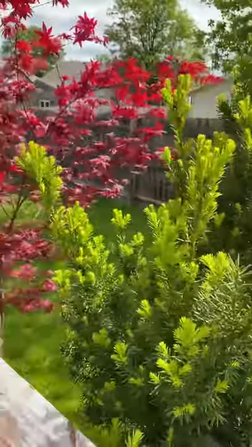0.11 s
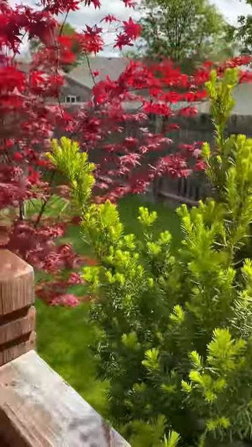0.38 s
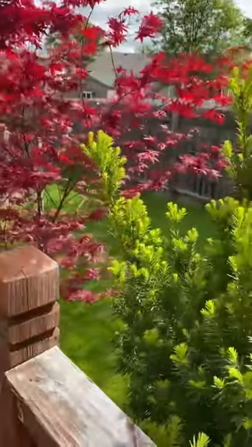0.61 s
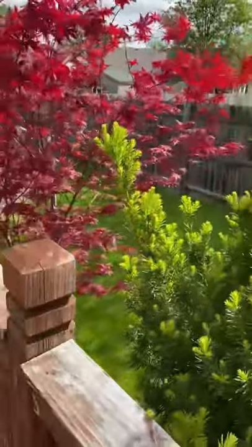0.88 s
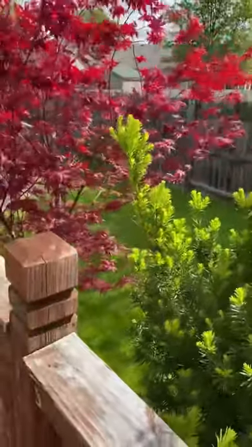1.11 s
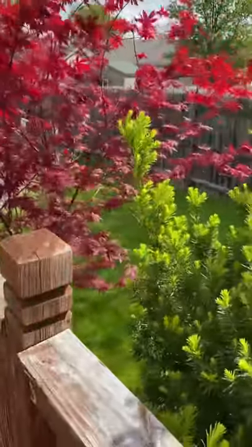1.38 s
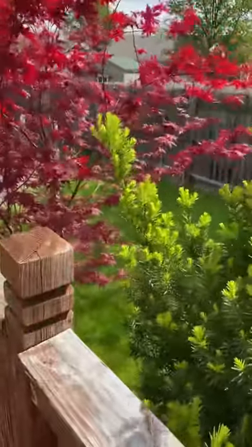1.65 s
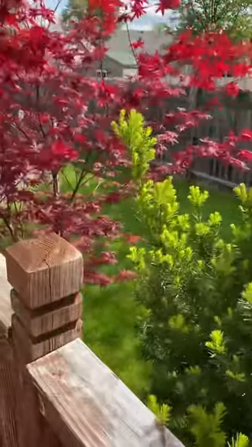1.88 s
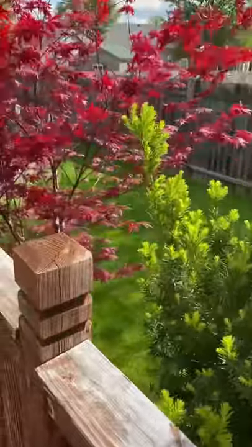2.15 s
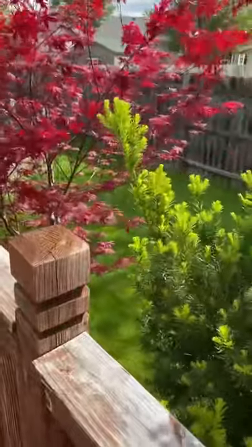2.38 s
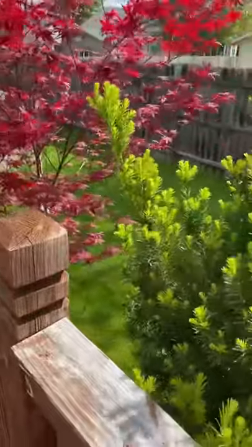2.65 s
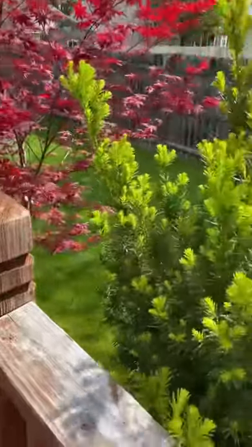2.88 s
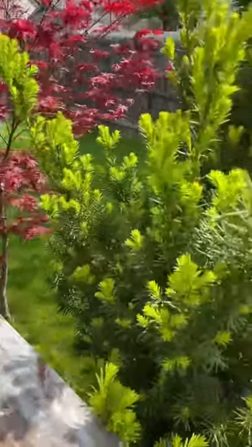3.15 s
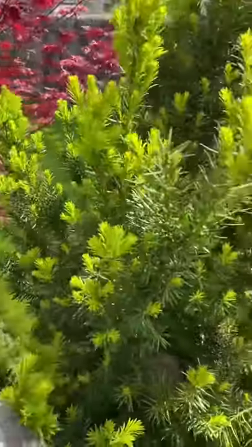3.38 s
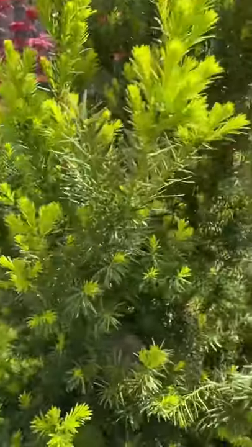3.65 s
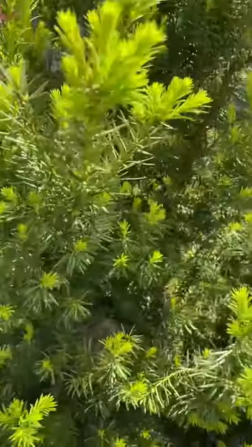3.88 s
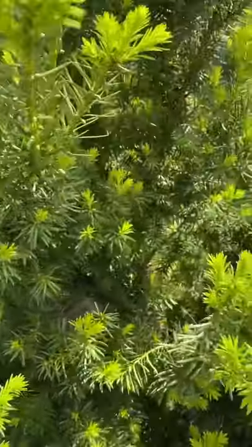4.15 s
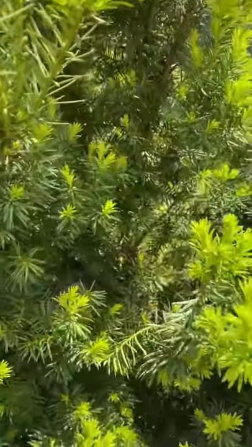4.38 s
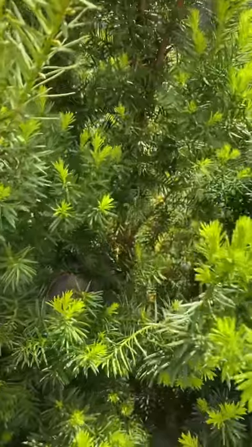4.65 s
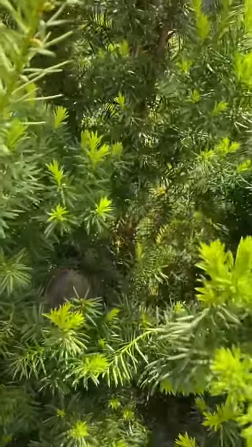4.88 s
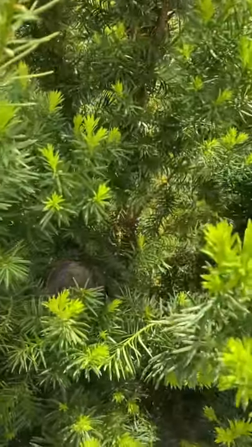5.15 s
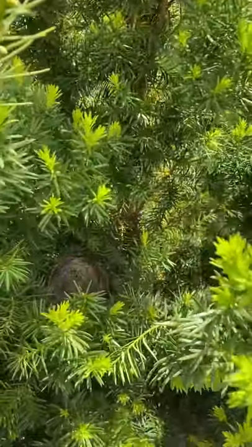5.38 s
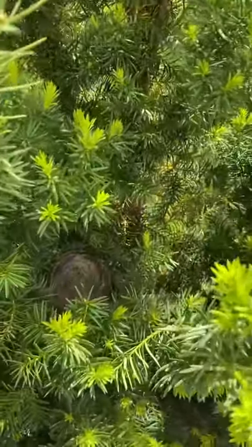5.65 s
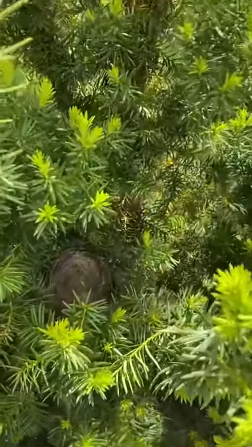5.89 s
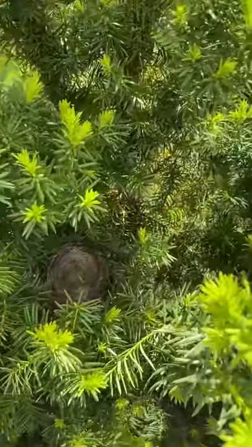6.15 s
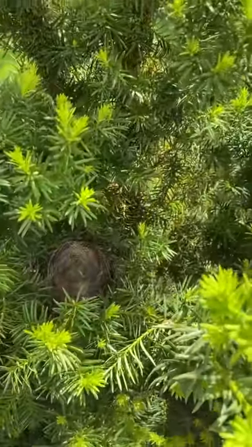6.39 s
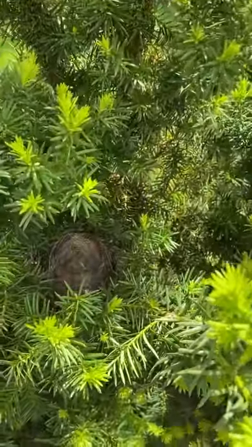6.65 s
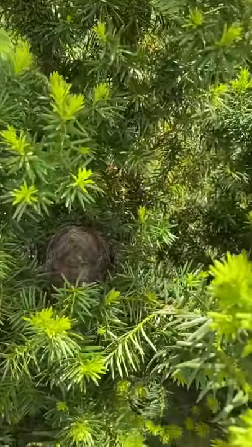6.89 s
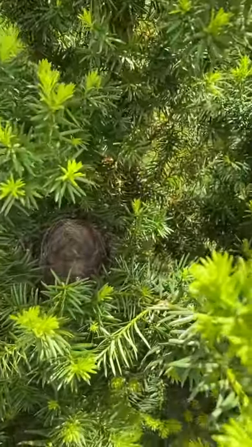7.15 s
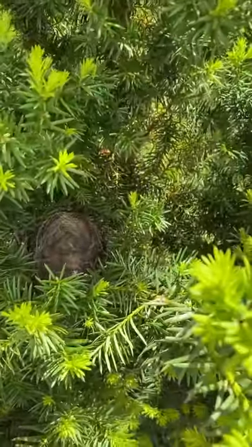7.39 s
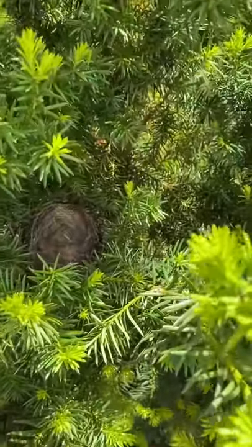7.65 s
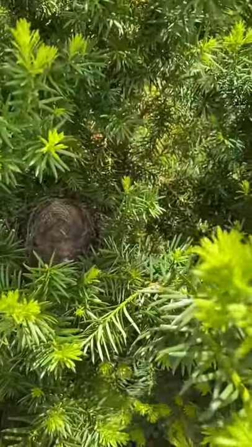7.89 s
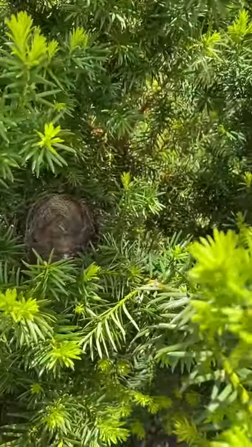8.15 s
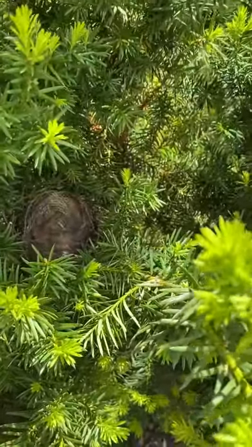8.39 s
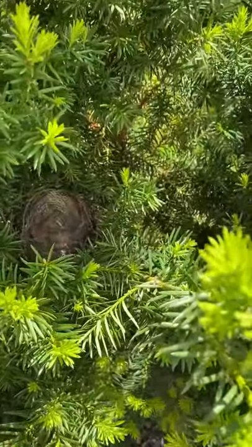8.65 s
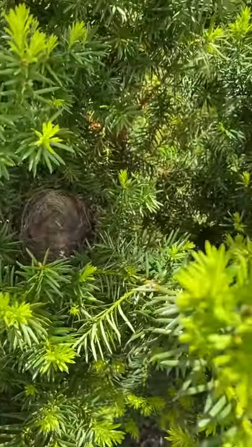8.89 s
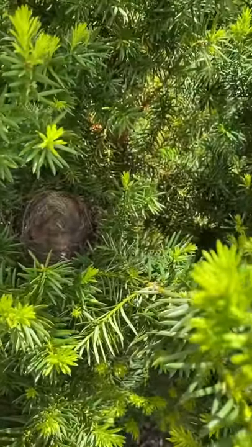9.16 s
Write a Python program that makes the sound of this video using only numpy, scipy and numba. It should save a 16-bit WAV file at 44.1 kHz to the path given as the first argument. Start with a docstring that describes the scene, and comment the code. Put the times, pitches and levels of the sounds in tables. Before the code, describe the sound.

In a backyard, a thrush-like bird a few metres to the left repeats one sharp, high chip, ten times at uneven gaps, each with a brief echo off fences and walls. Wind buffets the hand-held phone's microphone in the first seconds, with a low knock. A smaller distant bird twitters in the middle, faint wind chimes ring, and the later part grows calm.

```python
"""A thrush scolds from a fence a few metres left of a hand-held phone: both sides of its voice box sing arches
of pitch, which distort one another. A small bird further off whistles gliding notes; fences and walls echo
both. Wind chimes ring faintly as pairs of close tones, and shaped noise makes the far garden and a faint treble
hiss that swells a little, then fades. Gusts buffet the microphone as filtered clicks and noise under a low cut
that shifts over time. The hand knocks on the case, and a dry twig ticks."""
import sys
import numpy as np
from scipy import signal
from scipy.fft import rfft, irfft
from scipy.io import wavfile
from scipy.ndimage import uniform_filter1d
from numba import njit

SR = 44100
rng = np.random.default_rng(int(sys.argv[2]) if len(sys.argv) > 2 else 0)


def transcribe(u):
    """Save the signal u as a 16-bit wav file named by the first command-line argument.

    u: samples, shape (n,) or (channels, n), limited to [-1, 1]; the rate is SR.
    q: integer samples, one column per channel.
    """
    v = np.clip(np.atleast_2d(u).T, -1, 1)
    q = np.round(v * 32767).astype(np.int16)
    wavfile.write(sys.argv[1], SR, q)


def makeup_ratio(level_db):
    """Linear amplitude ratio for a level in decibels (20 dB per factor of ten)."""
    decades = np.asarray(level_db, float) / 20
    return 10 ** decades


N = 409248
TIME = np.arange(N) / SR  # seconds

# far traffic and trees, relative spectrum: pitch_hz, level_db
GARDEN_COLOUR = [(120, -38), (200, -7), (1140, -7), (1450, -12), (1740, -11.5), (2330, -14.5),
                 (4590, -17.5), (8720, -36), (10100, -35), (11900, -56), (16000, -60.5)]
# their balance between the sides: pitch_hz, left_minus_right_db
GARDEN_PAN = [(60, -10), (110, -0.5), (200, -8), (380, 3), (700, 2), (1290, 0.5), (2380, 4.5), (4400, 7),
              (8120, -0.5), (15000, -0.5)]
GARDEN_DB = -63  # rms before panning and slow swells
# level of a faint hiss, mostly high, swelling a little then fading, relative: start_s, level_db
TREBLE_HISS_LEVEL = [(0, -77.5), (.7, -73.5), (2.35, -72.5), (2.85, -78.5), (4.2, -82), (5.7, -83), (6.3, -90),
                     (7.5, -91.5), (9.28, -100)]
# spectrum of the treble hiss, relative: pitch_hz, level_db
TREBLE_HISS_COLOUR = [(1000, 2.5), (2500, 0.5), (5000, 4.5), (7500, -1), (8500, -28), (10000, 0.5), (12000, -20.5),
                      (14000, -1), (16000, -11)]

# gusts on the microphone, relative: middle_s, length_s, level_db, centre_hz
GUSTS = [(0.021, .1, -43.5, 350), (.31, .2, -42.5, 380), (.53, .1, -30.5, 490), (0.715, .12, -38.5, 480),
         (0.917, .05, -31.5, 450), (1.083, .08, -35.5, 350), (1.202, .14, -33.5, 550),
         (1.33, .06, -33, 450), (1.636, .08, -37, 525), (1.918, .08, -49.5, 320), (2.12, .1, -47, 350),
         (2.4, .1, -44.5, 250), (2.56, .12, -43, 240), (2.72, .1, -51.5, 320), (2.95, .06, -49, 450),
         (3.207, .2, -48.5, 380), (3.432, .12, -50, 480), (3.76, .08, -52, 420), (3.858, .06, -45, 420),
         (3.96, .08, -48.5, 330), (4.308, .2, -50.5, 370), (4.871, .08, -43, 270), (5.2, .12, -51.5, 240),
         (5.33, .06, -53.5, 220), (5.688, .06, -63, 230), (6.071, .08, -58.5, 195), (6.33, .08, -51, 280),
         (6.44, .05, -51, 195), (6.836, .12, -51, 180), (7.033, .16, -55, 175), (7.23, .06, -61.5, 250),
         (7.423, .04, -61, 255), (7.77, .1, -58, 200), (8.09, .06, -61, 260), (8.561, .1, -53.5, 170),
         (8.683, .08, -61.5, 250), (8.96, .16, -58, 185)]
GUST_FADE_DB_PER_S, CALM_DB, CALM_HZ = 220.5, -71.5, 380
EDDIES_PER_S, EDDY_SPREAD_DB, EDDY_SIDE_DB = 160, 17, -9
EDDY_DULL_RATIO = 2.48  # low-pass corner over the gust's centre pitch
RUMBLE_HZ, RUMBLE_DB = 104, -11
# strongest buffets, levels before panning and the low cut: start_s, peak_db, centre_hz
BUFFETS = [(0.023, -24.5, 373), (0.284, -20, 373), (0.364, -22, 494), (0.387, -16.5, 423), (0.45, -23, 386),
           (0.488, -12, 544), (0.511, -17, 379), (0.533, -16.5, 470), (0.555, -15, 551), (0.568, -20, 535),
           (0.591, -17, 505), (0.665, -19.5, 501.5), (0.748, -23.5, 410), (0.858, -29, 572.2),
           (0.875, -31, 573.9), (0.904, -16, 460), (0.937, -16, 607), (1.044, -36, 355), (1.138, -28, 456),
           (1.159, -31, 637), (1.211, -24, 590), (1.226, -46, 532), (1.305, -14, 740), (1.319, -22.5, 542),
           (1.353, -19.5, 640), (1.367, -17, 705), (1.562, -33, 590), (1.599, -27.5, 488),
           (1.683, -24, 589.1), (2.103, -28, 384), (2.158, -30, 317), (2.435, -25.5, 260),
           (2.529, -26, 238), (2.692, -28, 224), (2.717, -22, 457), (2.796, -19, 401), (2.928, -24, 466),
           (2.966, -23, 457), (3.214, -24.5, 431.2), (3.406, -31, 480), (3.447, -30, 567.9),
           (3.857, -22.5, 466), (3.866, -23, 513), (3.983, -28, 341), (4.276, -33, 380), (4.407, -32, 380),
           (4.831, -30.5, 272), (4.884, -24.5, 199.5), (5.216, -36.5, 204), (6.841, -39.5, 195.7),
           (7.088, -41.5, 181.1), (7.118, -40, 221.6), (7.23, -38, 262.1)]
BUFFET_CYCLES = 0.78
BUFFET_EDGE_DB, BUFFET_EDGE_RATIO = -18.5, 2.4  # a fainter, higher burst sharpens each buffet
# corner of the low cut: start_s, shared_sound_hz, left_minus_right_sound_hz
LOW_CUT = [(0, 110, 716), (.5, 158.7, 508), (1.33, 183.2, 305), (1.45, 340, 305), (1.7, 138.7, 220),
           (2.2, 165, 404), (2.5, 90, 422), (2.96, 100, 413), (3.05, 168.7, 420), (3.5, 196.5, 484),
           (4.1, 140, 355), (4.7, 208, 350), (5, 125, 240), (5.6, 140, 178.6), (6.3, 67.2, 66.5),
           (6.9, 45, 45), (7.45, 85, 70), (8.2, 85, 75), (8.55, 45, 45), (9.28, 68.3, 60)]

# knocks of the hand, levels before the case's low cut: start_s, peak_db, pitch_hz
KNOCKS = [(.3, -61, 55), (.56, -63, 55.43), (.93, -55.5, 61.3), (1.32, -16, 84), (1.65, -58, 58.07)]
# a dry twig, before the same cut: start_s, level_db
TWIG_TICK = (2.134, -37)
CASE_CUT_HZ = 100

# chime tubes: pitch_hz, beat_hz, time_to_fall_60_db_s, strikes (start_s, level_db)
TUBES = [(1090, 1.1, 8.5, [(2.0, -70.5), (4.1, -78)]), (1467, 1.9, 12, [(1.04, -68.5), (2.52, -63.5),
         (3.33, -66.5), (3.78, -65), (4.58, -66.5)]), (1760, 4.5, 9.7, [(4.45, -60.5), (5.0, -67.5),
         (6.4, -72), (8.0, -76)])]
SWAY_DB = 1.5

# distant song, relative: start_s, note name, level_db
SONG = [(1.329, "slide", -67.5), (1.592, "slide", -70), (1.995, "see", -55), (2.262, "drop", -66.5),
        (2.287, "see", -55.5), (2.497, "chip", -51), (2.515, "drop", -53.5), (2.494, "fork", -61.5),
        (2.742, "fork", -56), (2.959, "fork", -58), (2.55, "longer", -59), (2.745, "chip", -53),
        (2.765, "drop", -53), (2.799, "long", -52), (2.82, "mew", -72), (2.962, "chip", -51.5),
        (2.985, "drop", -52), (4.035, "swoop", -60), (4.053, "hold", -74), (4.218, "tick", -56),
        (4.272, "pipe", -65.5), (4.356, "swoop", -60), (4.374, "hold", -70), (4.56, "tick", -58.5),
        (4.618, "pipe", -68), (7.675, "sigh", -70.5)]
# its notes by name: length_ms, start_hz, end_hz, glide_ms
NOTES = {"chip": (17, 4350, 4900, 7.9), "drop": (17.9, 4150, 2700, 13), "rise": (38.5, 2000, 7570, 3.3),
         "fork": (16, 6100, 4900, 5), "slide": (220, 5350, 4600, 90), "see": (76, 5700, 5465, 15),
         "long": (95, 6000, 7210, 4), "swoop": (19, 5300, 7950, 10), "hold": (165, 7890, 8550, 45),
         "longer": (170, 6300, 7300, 4), "tick": (13.2, 5200, 2800, 9.1), "pipe": (44.03, 2450, 2420, 30),
         "mew": (75, 2623, 2660, 48.8), "sigh": (75, 3680, 2623, 39)}
# a phrase sung five times: note name, delay_s, level_db
PHRASE = [("chip", 0, -50), ("fork", -0.004, -59), ("drop", 0.018, -53), ("rise", .053, -57.5)]
PHRASE_S, PHRASE_EVERY_S, PHRASE_SWELL_DB = 3.148, .1192, 1  # louder each time
# span of a trill: start_s, end_s, clicks_per_s
TRILL = (3.742, 3.99, 56)
# its two notes: pitch_hz, delay (share of a cycle), level_db
TRILL_NOTES = [(3250, .01, -63), (2570, 0.4, -65)]
# one soft low cluck of the thrush: start_s, pitch_hz, level_db
CLUCK = [(2.276, 1286, -64.5), (2.282, 1543, -52), (2.292, 1696, -43), (2.305, 1500, -48.5),
         (2.316, 990, -54.5), (2.322, 900, -90)]
CLUCK_SECOND_DB, CLUCK_SECOND_RATIO = -11, 1.79  # the other side of the voice box
SONG_PAN_DB, SONG_SECOND_DB, SONG_WOBBLE_HZ, SONG_FLUTTER_DB = 13.5, -28.5, 39.91, 3
SONG_WET_DB = 4.5  # extra echo for the distant bird

# echoes of walls and fences, before dulling: delay_ms, left_db, right_db
ECHOES = [(4.05, -16, -24), (9.06, -16, -23), (26, -16, -20), (34.63, -22, -25), (48, -26, -30.5),
          (110, -31.5, -33), (182, -33, -36.5), (292.6, -35.5, -41.5)]
NEAR_T60_S, NEAR_DB, FAR_T60_S, FAR_DB, YARD_DULL_HZ = 0.17, -11, 0.59, -11.5, 7171.9
ECHO_SMEAR_MS, SMEAR_PER_DELAY, TAIL_RISE_MS = 0.25, .03, 8.2  # later echoes blur more

# alarm calls, relative: start_s, length_ms, low_voice_top_hz, high_voice_top_hz, level_db
ALARMS = [(0.265, 55.3, 4298, 7005, -20.5), (0.584, 58.6, 4376, 7263, -23),
          (1.196, 57.4, 4402, 7390, -22.5), (1.807, 62.3, 4334, 7274, -23), (3.006, 60.7, 4350, 7276, -30),
          (4.689, 60.4, 4280, 7074, -25), (5.851, 57, 4276, 7084, -24.5), (6.205, 64, 4355, 7480, -26.5),
          (6.683, 63.6, 4410, 7490, -27.5), (8.263, 60, 4255, 7096, -24.5)]
# how bird and phone face each other, one row a call:
# start_s, low_left_minus_right_db, high_left_minus_right_db, high_minus_low_db
BEARING = [(0.27, 10.5, 4.5, -6), (0.59, 10.5, 1.5, -4.5), (1.2, 13, 0, -6.5), (1.81, 8, 7.5, -6.5),
           (3.01, 19.5, 23.5, -6), (4.69, 13.5, 9.5, -6.5), (5.85, 14, -2.4, -4), (6.2, 15.5, -9.5, -5.5),
           (6.68, 14, -8, -3.5), (8.26, 13.5, .7, -4.5)]
# arch of each voice in a call: time (share of length), pitch (share of top), level_db
LOW_VOICE = [(-.45, .3, -58.5), (-.22, .36, -29), (-.08, .55, -17), (.12, .9, -12.5), (.28, 0.99, -2.5),
             (.75, 0.96, 0.5), (.95, .89, -2), (1.03, .64, -4.5), (1.12, .5, -12), (1.18, .38, -26),
             (1.32, .24, -30), (1.4, 0.28, -48)]
HIGH_VOICE = [(-.45, .3, -64.5), (-.26, .34, -22.5), (-.1, 0.61, -7), (.02, 0.74, -1.5), (.15, .9, -0.5),
              (.38, 0.99, -3.5), (.6, .97, -5), (.7, .89, -10.5), (.8, .8, -47.5), (.9, .7, -74.5)]
# tones from the voices distorting one another: multiple of low, multiple of high, level_db
OVERTONES = [(2, 0, -47), (1, 1, -9), (3, 0, -27.5), (0, 2, -6), (2, 1, -18)]
# phase by which left leads right: low_voice_rad, high_voice_rad, overtones_rad
LEFT_LEAD = (0.45, -0.72, -1.4)
# air hissing through the beak, relative to the high voice: time (share of length), level_db
HISS = [(-.42, -49), (-.25, -13), (-.05, -9), (.25, -20), (.6, -26), (1.0, -24), (1.4, -49.5)]
# spectrum of the hiss, relative: pitch_hz, level_db
HISS_COLOUR = [(900, -26.5), (2000, -5.5), (5000, 4.5), (7500, -1), (9200, -18), (11000, -5), (12200, -14),
               (14500, -4), (16500, -17)]
HISS_APART = 0.46  # strength of the unlike hiss at each port, beside the shared hiss
RASP_DB, RASP_HZ, WAVER_DB = -29, 1500, 2


def level(x, db):
    """Scale to an rms level."""
    return x * makeup_ratio(db) / np.sqrt(np.mean(x ** 2))


def panned(x, pan_db):
    """Two channels that differ in level."""
    return np.array([x * makeup_ratio(pan_db / 2), x * makeup_ratio(-pan_db / 2)])


def curve(table, t=TIME):
    """Columns of a table joined by straight lines."""
    s, *columns = np.transpose(table)
    return [np.interp(t, s, c) for c in columns]


def colour(x, points):
    """Shape a spectrum by (Hz, dB) points."""
    point_hz, point_db = np.array(points).T
    log_hz = np.log(np.arange(N // 2 + 1) * SR / N + 1)
    return irfft(rfft(x) * makeup_ratio(np.interp(log_hz, np.log(point_hz), point_db)), N)


def walk(rate):
    """Random levels held 1 / rate s and smoothed twice; spread near 1."""
    k = int(SR / rate)
    steps = np.repeat(rng.standard_normal(N // k + 1), k)
    return 1.14 * uniform_filter1d(uniform_filter1d(steps, k), k)[:N]


def add(out, s, x):
    """Mix a short sound in at a time."""
    i = max(int(s * SR), 0)
    n = min(x.shape[-1], N - i)
    out[..., i:i + n] += x[..., :n]


def puff(hz, cycles, phase):
    """A bell-shaped burst of a few cycles."""
    half = int(3 * cycles * SR / hz)
    t = np.arange(-half, half) / SR
    return np.exp(-(t * hz / cycles) ** 2) * np.cos(2 * np.pi * hz * t + phase)


@njit
def svf(x, hz, k, high):
    """Filter with a moving corner: high-pass or band-pass; a smaller k rings more."""
    y, b, l = np.empty(len(x)), 0., 0.
    for i in range(len(x)):
        g = np.tan(np.pi * hz[i] / SR)
        v = (b + g * (x[i] - l)) / (1 + g * (g + k))
        low = l + g * v
        b, l = 2 * v - b, 2 * low - l
        y[i] = x[i] - k * v - low if high else k * v
    return y


def garden():
    """Far traffic and trees, unrelated left and right; a faint flickering treble hiss swells, then fades."""
    far = level(colour(rng.standard_normal((2, N)), GARDEN_COLOUR), GARDEN_DB) * makeup_ratio(2.2 * walk(0.99))
    tilt = [[(hz, sign * db / 2) for hz, db in GARDEN_PAN] for sign in (1, -1)]
    far = np.array([colour(c, points) for c, points in zip(far, tilt)])
    treble = rng.standard_normal((2, N)) * makeup_ratio(2.5 * walk(25))
    near = colour(treble, [(300, -41.5)] + TREBLE_HISS_COLOUR)
    return far + level(near, 11.0) * makeup_ratio(curve(TREBLE_HISS_LEVEL)[0])


def gusts():
    """Each gust holds, fading on both sides to the calm; louder gusts weigh more in the pitch."""
    t = TIME[::64]
    s, length, db, hz = np.array(GUSTS).T[:, :, None]
    outside_s = np.maximum(np.abs(t - s) - length / 2, 0)
    power = makeup_ratio(db - GUST_FADE_DB_PER_S * outside_s) ** 2
    calm = makeup_ratio(CALM_DB) ** 2
    total = power.sum(axis=0) + calm
    centre = ((power * hz).sum(axis=0) + calm * CALM_HZ) / total
    return np.interp(TIME, t, centre), np.interp(TIME, t, np.sqrt(total))


def wind():
    """Eddies of uneven size and pitch strike the ports in flurries; the strongest are short dull buffets."""
    hz, strength = gusts()
    chance = rng.random((3, N))
    hits = chance[0] < EDDIES_PER_S / SR
    eddies = hits * makeup_ratio(-EDDY_SPREAD_DB * chance[1]) * np.sign(chance[2] - .5)
    rush = (level(eddies, 0) + 0.42 * rng.standard_normal(N)) * makeup_ratio(4.3 * walk(30))
    # taking away the high-pass and band-pass parts leaves the low-pass part
    dull_hz = EDDY_DULL_RATIO * hz
    rush = rush - svf(rush, dull_hz, 1.4, True) - svf(rush, dull_hz, 1.4, False)
    eddy_hz = hz * makeup_ratio(2.5596 * walk(70))
    mid = svf(svf(rush, eddy_hz, 0.41, False), eddy_hz, 1.3, False)
    side = svf(svf(rush * walk(40), 1.1 * eddy_hz, .8, False), 1.2 * eddy_hz, 2.2, False)
    rumble_hz = np.full(N, 1. * RUMBLE_HZ)
    rumble = svf(svf(rush, rumble_hz, 1.2, False), rumble_hz, 1.2, False)
    shared = level(mid, 0) + level(rumble, RUMBLE_DB)
    apart = level(side, EDDY_SIDE_DB) * np.array([[1], [-1]])  # opposite at the two sides
    out = strength * np.sqrt(400 / hz) * (shared + apart)
    draws = rng.uniform(-0.8, 1, (len(BUFFETS), 2))
    for (s, peak_db, centre_hz), (turn, lean) in zip(BUFFETS, draws):
        burst = puff(centre_hz, BUFFET_CYCLES, turn)
        edge = puff(BUFFET_EDGE_RATIO * centre_hz, BUFFET_CYCLES, turn)
        add(burst, 1.5 / centre_hz, makeup_ratio(BUFFET_EDGE_DB) * edge)
        add(out, s + .004 - len(burst) / 2 / SR, panned(makeup_ratio(peak_db) * burst, 5 * lean))
    return out


def hand():
    """Soft knocks through the case are low bursts; one dry tick is fast-fading noise."""
    out = np.zeros(N)
    for s, db, hz in KNOCKS:
        add(out, s - 2.4 / hz, makeup_ratio(db) * puff(hz, 0.78, 0))
    tick_s, tick_db = TWIG_TICK
    add(out, tick_s, makeup_ratio(tick_db) * rng.standard_normal(120) * np.exp(-np.arange(120) / 18.0))
    return signal.sosfilt(signal.butter(2, CASE_CUT_HZ, "high", fs=SR, output="sos"), out)


def chimes():
    """Each tube rings with two close modes that beat, and wavers as it sways."""
    out = np.zeros((2, N))
    for hz, beat_hz, t60, strikes in TUBES:
        sway = makeup_ratio(SWAY_DB * walk(5.8))
        for s, db in strikes:
            t = np.maximum(TIME - s, 0)
            turn = rng.uniform(0, 2 * np.pi, (2, 1))
            pair = np.sin(2 * np.pi * hz * t + turn)
            pair += 0.35 * np.sin(2 * np.pi * (hz + beat_hz) * t + turn)
            out += makeup_ratio(db) * np.minimum(t / 0.02, 1) * 1000. ** (-t / t60) * pair * sway
    return out


def song():
    """Whistled notes that glide to their end pitch and a two-note trill, with the thrush's soft two-voiced
    cluck."""
    out, wobble = np.zeros(N), SONG_WOBBLE_HZ * walk(200)
    phrase = [(PHRASE_S + k * PHRASE_EVERY_S + late, note, db + k * PHRASE_SWELL_DB)
              for k in range(5) for note, late, db in PHRASE]
    for s, note, db in SONG + phrase:
        ms, start_hz, end_hz, glide_ms = NOTES[note]
        t = np.arange(int(ms * SR / 1000)) / SR * 1000  # milliseconds
        hz = end_hz + (start_hz - end_hz) * np.exp(-t / glide_ms) + wobble[int(s * SR):][:len(t)]
        phase = 2 * np.pi * np.cumsum(hz) / SR
        fade = np.minimum(np.minimum(t, ms - t) / 5, 1)
        whistle = np.sin(phase) + makeup_ratio(SONG_SECOND_DB) * np.sin(2 * phase)
        add(out, s, makeup_ratio(db) * fade * whistle)
    trill_start, trill_end, clicks_per_s = TRILL
    for s in np.arange(trill_start, trill_end, 1 / clicks_per_s):
        for hz, late, db in TRILL_NOTES:
            add(out, s + late / clicks_per_s, makeup_ratio(db + 2 * rng.standard_normal()) * puff(hz, 5.0, 0))
    hz, db = curve(CLUCK)
    phase = 2 * np.pi * np.cumsum(hz) / SR
    voiced = (TIME > CLUCK[0][0]) & (TIME < CLUCK[-1][0])
    cluck = np.sin(phase) + makeup_ratio(CLUCK_SECOND_DB) * np.sin(CLUCK_SECOND_RATIO * phase)
    out += voiced * makeup_ratio(db) * cluck
    return panned(np.sqrt(2) * out * makeup_ratio(SONG_FLUTTER_DB * walk(80)), SONG_PAN_DB)


def yard(x, direct_db):
    """Direct sound, blurred echoes of walls, and scattered near and far tails, unlike at each side."""
    ms = TIME[:SR] * 1000
    near = level(1000. ** (-ms / 1000 / NEAR_T60_S), NEAR_DB)
    far = level(1000. ** (-ms / 1000 / FAR_T60_S), FAR_DB)
    shape = np.tile((near + far) * np.minimum(ms / TAIL_RISE_MS, 1) / np.sqrt(SR), (2, 1))
    for delay_ms, *db in ECHOES:
        smear_ms = ECHO_SMEAR_MS + SMEAR_PER_DELAY * delay_ms
        echo = level(np.exp(-((ms - delay_ms) / smear_ms) ** 2), 0)
        shape += makeup_ratio(np.array(db))[:, None] * echo / np.sqrt(SR)
    dull = signal.butter(2, YARD_DULL_HZ, fs=SR, output="sos")
    tails = signal.sosfilt(dull, shape * rng.standard_normal((2, SR)))
    return makeup_ratio(direct_db) * x + signal.fftconvolve(x.mean(axis=0)[None], tails, axes=1)[:, :N]


def alarms():
    """Each call stretches the same two arches; a rasp roughens them and air hisses past."""
    out, breath = np.zeros((2, N)), np.zeros(N)
    rasp = signal.sosfilt(signal.butter(2, RASP_HZ, fs=SR, output="sos"), rng.standard_normal(N))
    waver = makeup_ratio(WAVER_DB * walk(150)) + level(rasp, RASP_DB)
    low_lead, high_lead, over_lead = (np.array([[r / 2], [-r / 2]]) for r in LEFT_LEAD)
    for (s, ms, low_hz, high_hz, low_db), (_, low_pan_db, high_pan_db, below_db) in zip(ALARMS, BEARING):
        high_db = low_db + below_db
        u = np.arange(-.45, 1.4, 1000 / ms / SR)  # time as a share of the call's length
        low, low_shape = curve(LOW_VOICE, u)
        high, high_shape = curve(HIGH_VOICE, u)
        low_phase = 2 * np.pi * np.cumsum(low * low_hz) / SR
        high_phase = 2 * np.pi * np.cumsum(high * high_hz) / SR
        call = panned(makeup_ratio(low_db + low_shape), low_pan_db) * np.sin(low_phase + low_lead)
        call += panned(makeup_ratio(high_db + high_shape), high_pan_db) * np.sin(high_phase + high_lead)
        for m, n, db in OVERTONES:
            # a mixed tone takes the mean level of its voices and comes out mainly near the top of the arch
            mean_db = (m * (low_db + low_shape) + n * (high_db + high_shape)) / (m + n)
            mixed = np.sin(m * low_phase + n * high_phase + over_lead)
            call += makeup_ratio(db + mean_db) * low ** 3 * mixed
        begin_s = s - .45 * ms / 1000
        add(out, begin_s, call)
        add(breath, begin_s, makeup_ratio(high_db + curve(HISS, u)[0]))
    air = rng.standard_normal((3, N))
    # the right port hears the shared hiss two samples late
    air = np.array([air[0], np.roll(air[0], 2)]) + HISS_APART * air[1:]
    return np.sqrt(2) * waver * out + breath * level(colour(air, HISS_COLOUR), 7.2)


def scene():
    """Birds and their echoes over wind and garden under a moving low cut; knocks pass through the case."""
    wet_song = makeup_ratio(SONG_WET_DB) * yard(song(), -SONG_WET_DB)
    air = yard(alarms(), 0) + wet_song + chimes() + garden() + wind()
    cut = []
    # the shared and the left-minus-right sound have their own corners
    for x, hz in zip((air[0] + air[1], air[0] - air[1]), curve(LOW_CUT)):
        for k in (1.85, .77, 1.85, .77):
            x = svf(x, hz, k, True)
        cut.append(x / 2)
    return np.array([cut[0] + cut[1], cut[0] - cut[1]]) + hand()


def band_limit(x):
    """A steep low-pass at the top of the band."""
    return signal.sosfilt(signal.butter(12, 16120, fs=SR, output="sos"), x)


def record(dry):
    """The finished mix as the phone keeps it."""
    return band_limit(dry)


dry = scene()
out = record(dry)
transcribe(out)
```